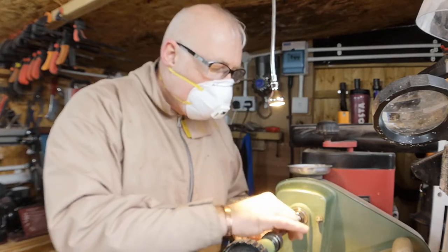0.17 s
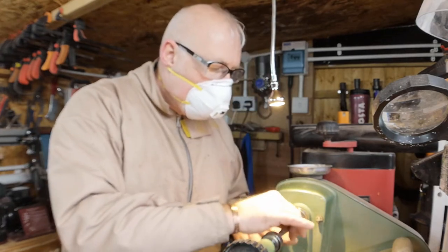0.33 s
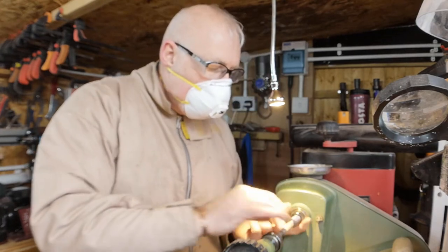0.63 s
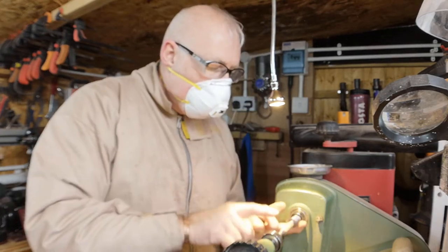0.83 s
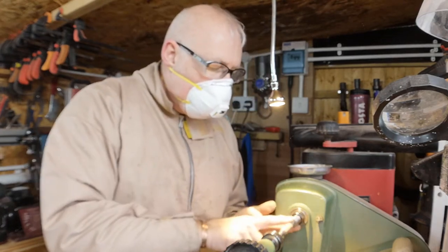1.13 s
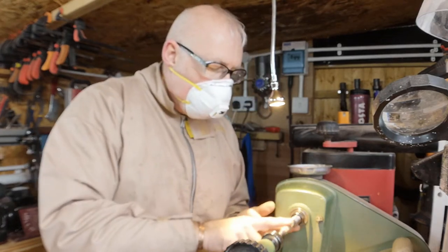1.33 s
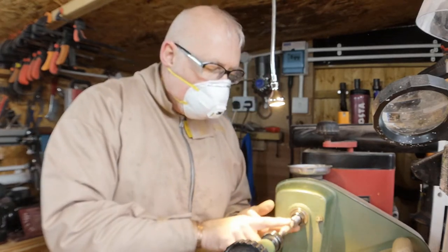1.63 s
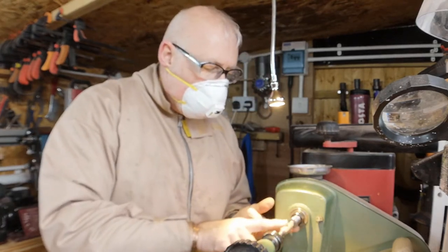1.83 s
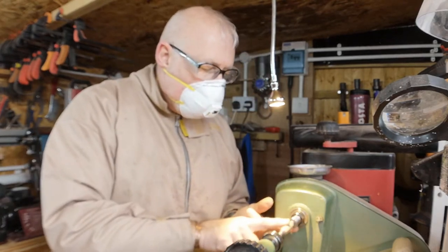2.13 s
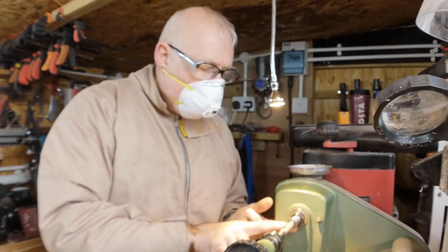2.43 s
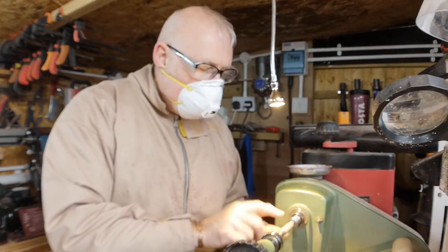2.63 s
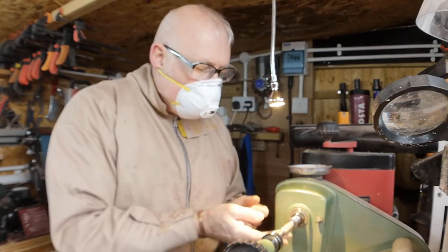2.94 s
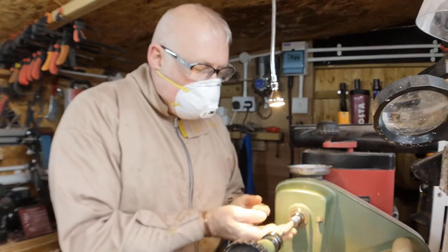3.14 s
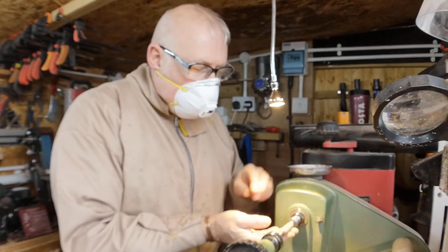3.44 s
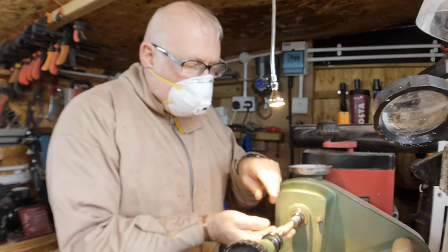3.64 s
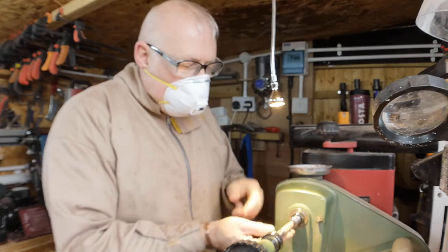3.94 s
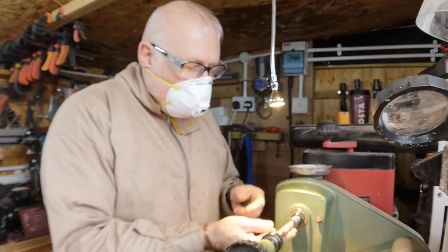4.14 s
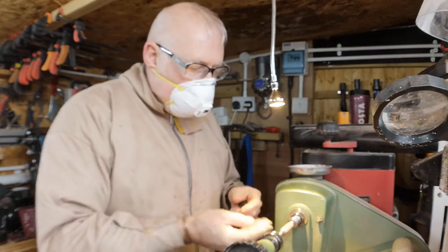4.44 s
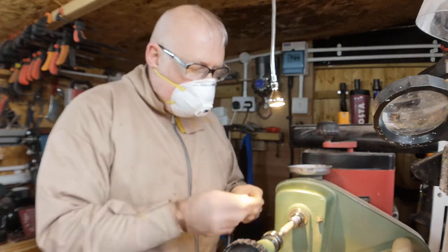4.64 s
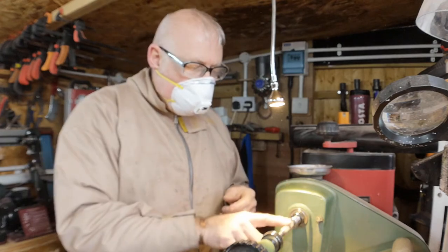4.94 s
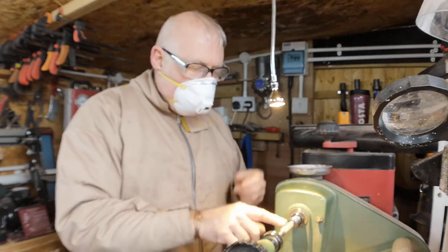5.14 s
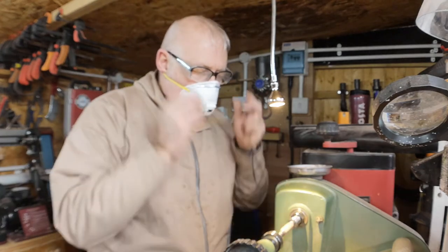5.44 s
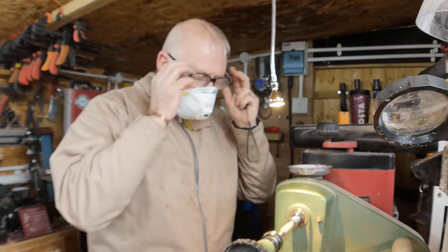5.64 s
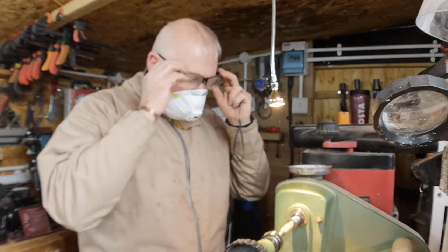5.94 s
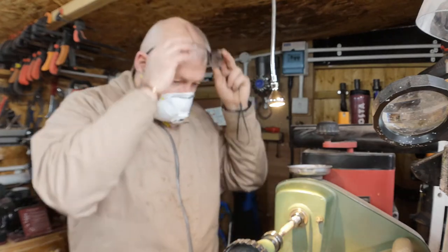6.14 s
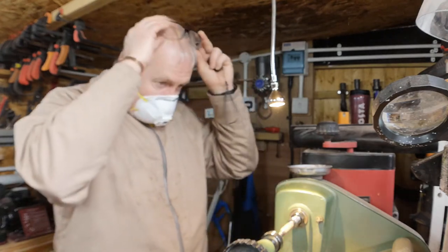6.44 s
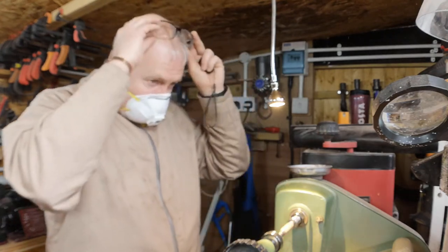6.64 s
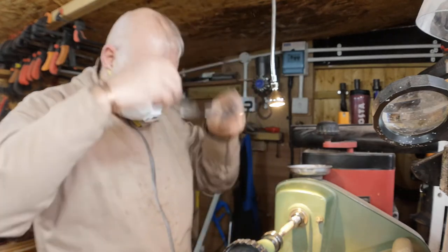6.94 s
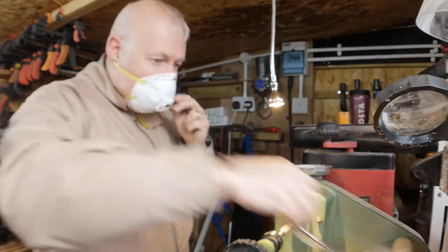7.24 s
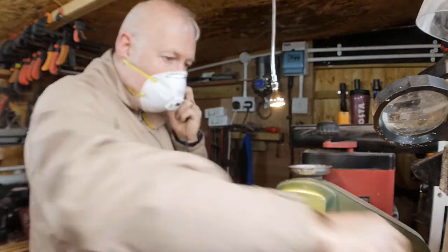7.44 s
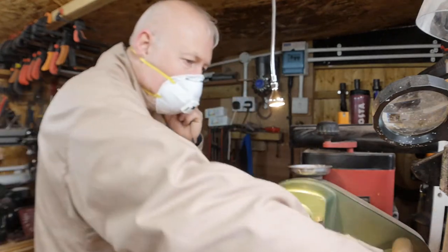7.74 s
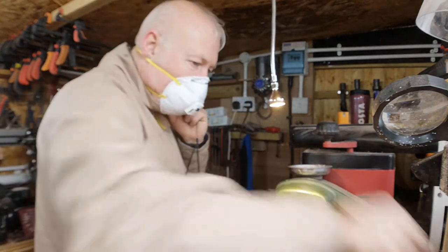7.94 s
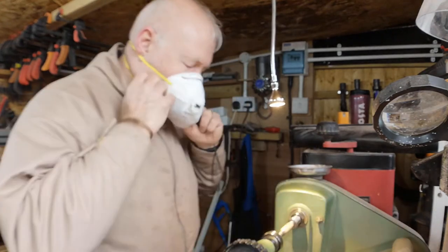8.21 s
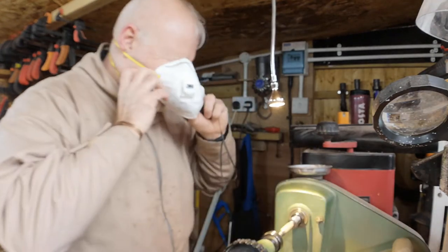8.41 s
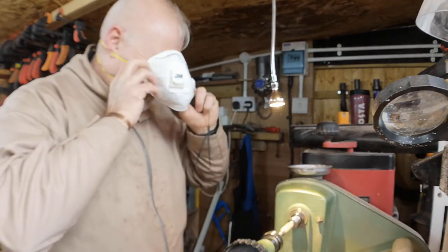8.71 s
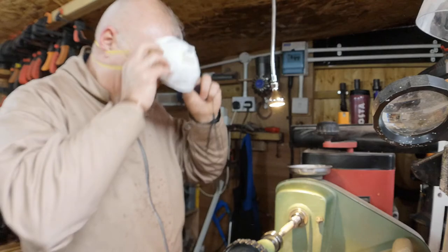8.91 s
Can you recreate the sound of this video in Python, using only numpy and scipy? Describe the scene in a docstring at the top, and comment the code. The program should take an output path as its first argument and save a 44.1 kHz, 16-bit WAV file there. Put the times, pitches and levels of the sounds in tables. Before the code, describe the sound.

In a small shed, soft hand rubbing and a lathe clack give way to rustling cloth, gritty shuffles and a sharp snap.

```python
"""A hand rubs a turned blank on a stopped wood lathe in a small, cluttered shed; the spindle clacks once.
The man shuffles back over gritty, booming floorboards, takes off his safety glasses, whose arm snaps
shut, steps over to lay them down and pulls at his dust mask. His canvas sleeves swish as he moves.
Every rub, swish and scrape is a dense run of tiny slips; every knock is a short chatter and a ring.
A low rumble and a faint hiss lie underneath."""
import sys
import numpy as np
from scipy import signal
from scipy.fft import rfft, irfft
from scipy.io import wavfile

SR = 44100
rng = np.random.default_rng(int(sys.argv[2]) if len(sys.argv) > 2 else 0)


def dump(signal):
    """Clip the signal to [-1, 1] and save it as 16-bit WAV at the path in sys.argv[1]."""
    limited = np.clip(np.atleast_2d(signal).T, -1, 1)
    pcm = np.round(limited * 32767).astype(np.int16)
    wavfile.write(sys.argv[1], SR, pcm)


N = 399972
TIME = np.arange(N) / SR

# palm strokes along the blank: peak_s, length_s, effort_db
PALM_STROKES = [(0.06, .15, -70.5), (0.27, 0.079, -74), (0.44, 0.085, -74), (0.59, 0.12, -71.5),
                (0.86, .1, -77)]
# how hard the fingertip rubs the blank: time_s, effort_db
FINGER_EFFORT = [(1.02, -82), (1.078, -81), (1.306, -75.5), (1.332, -82), (2.438, -84.5), (2.462, -83),
                 (2.506, -81.5), (2.522, -89), (2.8, -112)]
# sleeve swishes over the jacket, one per arm move: peak_s, length_s, effort_db
SLEEVE_STROKES = [(3.05, 0.089, -71.5), (3.22, 0.057, -80), (3.36, 0.034, -77.5), (3.495, 0.099, -67),
                  (3.62, 0.094, -67.5), (3.785, .07, -72.5), (4.05, 0.21, -69.5), (4.25, 0.065, -75.5),
                  (4.44, .07, -69.5), (4.98, 0.26, -91), (5.54, 0.3, -65.5), (6.25, 0.3, -75),
                  (7.08, 0.082, -68.5), (7.515, 0.098, -67.5), (7.6, 0.078, -69.5), (7.98, 0.39, -61),
                  (8.45, 0.2, -61), (8.98, 0.23, -65)]
# friction colour of palm, fingertip and canvas: freq_hz, gain_db
PALM_EQ = [(300, -12), (900, -6), (1700, -1), (4000, -8.5), (5800, -5.5), (8200, -2.5), (10000, -13.5),
           (15000, -22)]
FINGER_EQ = [(300, -12), (900, -13), (1700, -2), (4200, -10.5), (5300, -4.5), (8200, -1.5), (10000, -16),
             (15000, -17)]
SLEEVE_EQ = [(250, -4), (600, -7), (1100, -2.5), (2000, 3.5), (3400, -3), (4500, -3), (5800, 1), (8200, 2),
             (10000, -13.5), (12000, -19.5), (15000, -19.5)]
# narrow peaks that colour the rubbing sound: centre_hz, width_hz, lift_db
PALM_EQ_PEAKS = [(1710, 220, 4), (5760, 520, 9), (7560, 510, 4.5)]
FINGER_EQ_PEAKS = [(1690, 150, 5.1), (3380, 150, 6), (3800, 210, 6.6), (5200, 320, 8.4), (7830, 190, 7)]
# squeals of sliding skin or cloth: peak_s, length_s, level_db, pitch_hz
SLIDE_SQUEALS = [(0.516, 0.11, -77.5, 5760), (2.203, 0.78, -82, 7620), (7.738, 0.036, -56, 6000)]

# contacts of the lathe spindle, the arm of the glasses and the heel: start_s, level_db, chatter_s
SPINDLE_HITS = [(0.910, -41.5, 0.0018), (0.913, -38.5, 0.0045), (0.927, -44, 0.0054), (0.938, -56, .003)]
GLASSES_HITS = [(7.1548, -28, 0.0018), (7.1568, -21, 0.005), (7.166, -30, 0.013)]
HEEL_HITS = [(7.886, -37.5, 0.036), (7.9075, -25.5, 0.013), (7.916, -25.5, 0.013), (7.943, -43, 0.0053)]
# colour of each attack: freq_hz, gain_db
SPINDLE_EQ = [(200, 1.5), (600, -10), (900, 8.5), (1250, -18), (1750, 5), (2750, 6), (4000, -6),
              (5600, -0.5), (6800, -13.5), (9600, -15), (11000, -35), (15000, -28)]
GLASSES_EQ = [(300, -27), (900, -29.5), (1600, -18), (2600, -19.5), (3600, -3), (4500, -14), (6000, -5.5),
              (8400, -3), (10500, -13.5), (12500, -16), (15000, -21.5)]
HEEL_EQ = [(80, 7), (300, 3), (650, -3.5), (900, 1.5), (1700, -4.5), (2700, -3), (4200, -18), (6000, -19.5),
           (8400, -14), (10500, -33), (15000, -36)]
# ring of the spindle and the board, relative to the hardest contact: pitch_hz, level_db, t60_s
SPINDLE_MODES = [(356, -26, 0.49), (804, -12, 0.18), (1700, -8, 0.11), (2720, -5, .11), (3350, -14, 0.069),
                 (4730, -21, 0.11), (5740, -15, 0.11), (7840, -14, 0.082), (9510, -28, .12)]
HOLLOW_BOARD_MODES = [(517, -4.5, 0.178), (785, -6.5, 0.1), (1125, -11, 0.062), (1630, -11, 0.051),
                      (2006, -9, 0.064)]
# bright ringing pitches heard after the snap, relative to its hardest contact: pitch_hz, level_db, t60_s
AFTER_SNAP_RING = [(2110, -26, 0.099), (3740, -24, 0.15), (5660, -18, 0.17), (5700, -4, 0.06),
                   (6340, -25, 0.071), (6640, -5.5, 0.064), (7500, -2, 0.064), (8043, -26, 0.12),
                   (8260, -16, 0.093)]

# short rasping scrapes (soles on grit, a light finger brush, a rub of the dust mask):
# peak_s, length_s, level_db, rasp_hz, rasp_lift_db, treble_db
SCRAPES = [ (2.96, 0.027, -65.5, 3350, 7, -9), (5.779, 0.037, -50.5, 2260, 15, -3),
           (5.948, 0.04, -44, 2860, 6.5, -1), (7.692, 0.013, -51.5, 980, 11, -15),
           (7.729, 0.029, -47.5, 2960, 0, -9.5), (7.801, 0.047, -45, 1030, 8.5, 3),
           (7.978, 0.057, -54, 520, 5.5, -8), (8.094, 0.018, -58, 1690, 4, 0),
           (8.636, 0.011, -50.5, 1690, 17.5, 6), (8.652, 0.014, -47.5, 1950, 0, -20.5),
           (8.991, 0.18, -64.5, 1030, 21, 4)]
# colour of the scrapes: freq_hz, gain_db
SCRAPE_EQ = [(100, -18), (300, 1.5), (700, -11.5), (1100, -6), (1800, -3.5), (3000, -4), (4300, -8.5),
             (6000, -13), (8400, -6), (10500, -22), (15000, -31)]
# narrow peaks common to all scrapes: centre_hz, width_hz, lift_db
SCRAPE_EQ_PEAKS = [(520, 18, 6.5), (5600, 130, 14), (7560, 470, 6.5)]
# floorboards booming as his weight shifts: peak_s, rise_s, level_db, pitch_hz
BOARD_BOOMS = [(5.793, 0.021, -42, 123), (5.961, .034, -41.5, 121.6), (7.2, 0.022, -49, 88.2),
               (7.766, 0.043, -45, 182.3), (7.936, 0.021, -39.5, 95.1), (7.99, 0.029, -40.5, 190),
               (8.653, 0.021, -50.5, 205.6)]
# low end of the rocking floor: freq_hz, gain_db
FLOOR_EQ = [(15, -14.5), (35, 7.5), (65, -4), (110, -4.5), (200, -26), (500, -38), (1500, -64)]

# glasses, then dust mask, brushing over head and collar: peak_s, length_s, level_db, treble_db
HEAD_BRUSHES = [(7.011, 0.042, -58, 1.5), (8.304, 0.027, -61.5, -10), (8.383, 0.038, -52, 4),
                (8.495, 0.033, -60.5, -9), (8.716, 0.094, -65.5, 21), (8.818, 0.038, -63.5, -20),
                (8.963, 0.049, -54.5, -10)]
# colour of that brushing: freq_hz, gain_db
BRUSH_EQ = [(300, -20.5), (900, -8), (2000, -2), (3800, -4.5), (6000, -1), (8100, 4), (9600, -4),
            (11000, -15.5), (15000, -21.5)]
# wood and plastic ticking under the fingers: start_s, level_db, ring_hz, ring_lift_db, treble_db
FINGER_TICKS = [(1.928, -58, 500, 17, -8), (5.439, -48.5, 800, 22, -19), (5.859, -42.5, 2250, 20, 15),
                (6.743, -59, 2340, 20, -13), (6.814, -51, 2960, 8, 13), (6.903, -52.5, 2720, 13, 12),
                (6.967, -42, 3300, -2, 19), (8.67, -47.5, 3800, 26, 1)]
# colour of the ticks: freq_hz, gain_db
TICK_EQ = [(200, -4), (700, -14), (2000, 13), (4500, 4.5), (8200, 1.5), (11000, -44), (15000, -35)]
# colour of the steady rumble and hiss: freq_hz, gain_db
RUMBLE_EQ = [(12, -1.5), (25, -2.5), (45, -4.5), (65, -8), (100, -13.5), (150, -23.5), (220, -31.5),
             (400, -35.5), (1000, -67.5)]
HISS_EQ = [(60, -11), (200, 7.5), (500, -3.5), (1000, 2), (1800, 1), (2600, 2.5), (4000, -5), (6000, -8),
           (8000, -9), (10000, -9.5), (15000, -11)]


def palm():
    """The palm strokes the blank, resting lightly on the wood between strokes until the clack."""
    effort_db = strokes_db(PALM_STROKES, rest_db=-81, start_s=0, end_s=SPINDLE_HITS[0][0])
    return amp(2.0) * rubbing(effort_db, PALM_EQ, PALM_EQ_PEAKS, flutter_db=1.0, side_db=-12.5)


def fingertip():
    """A fingertip slides over the blank, pressing now harder, now softer."""
    effort_db = np.interp(TIME, *np.transpose(FINGER_EFFORT), left=-120, right=-120)
    return amp(5.5) * rubbing(effort_db, FINGER_EQ, FINGER_EQ_PEAKS, flutter_db=1.5, side_db=-11)


def sleeves():
    """Canvas swishes on canvas, over a faint rustle once he lets go of the blank."""
    effort_db = strokes_db(SLEEVE_STROKES, rest_db=-79, start_s=2.85, end_s=np.inf)
    return amp(1.5) * rubbing(effort_db, SLEEVE_EQ, [], flutter_db=2.0, side_db=-13)


def squeals(width_hz=180, flutter_db=3.5):
    """The slips of sliding skin or cloth gather round one high pitch."""
    out = np.zeros(N)
    for peak_s, length_s, level_db, pitch_hz in SLIDE_SQUEALS:
        slips = grains(N, per_s=4400, spread_db=6)
        ringing = signal.lfilter(*signal.iirpeak(pitch_hz, pitch_hz / width_hz, fs=SR), slips)
        out += amp(level_db) * stroke(TIME - peak_s, length_s) * rms_one(ringing)
    out *= amp(flutter_db * drift(27))
    return shed(pan(out, -8), direct_db=-5, near_db=-2, tail_db=-13)


def spindle_clack():
    """The lathe spindle knocks in one quick cluster of contacts and rings on."""
    return struck(SPINDLE_HITS, SPINDLE_EQ, SPINDLE_MODES, side_db=-4.5, near_db=-1.5, tail_db=-5)


def glasses_snap():
    """The arm of the glasses snaps shut; bright pitches ring briefly after it."""
    return struck(GLASSES_HITS, GLASSES_EQ, AFTER_SNAP_RING, side_db=-6.5, near_db=0, tail_db=-7)


def heel_knock():
    """A heel comes down on a hollow board."""
    return struck(HEEL_HITS, HEEL_EQ, HOLLOW_BOARD_MODES, side_db=-5.5, near_db=-6, tail_db=-13.5)


def scrapes(rasp_width_hz=450, lead_s=.2):
    """Soles on grit, a light finger brush and a rub of the dust mask, each rasping at its own pitch."""
    out, t = np.zeros((2, N)), TIME[:SR // 2] - lead_s
    for peak_s, length_s, level_db, rasp_hz, lift_db, treble_db in SCRAPES:
        pressure = amp(level_db) * stroke(t, length_s)
        rasp = [(rasp_hz, rasp_width_hz, lift_db), *SCRAPE_EQ_PEAKS]
        slips = [pressure * grains(len(t), per_s=5000, spread_db=2.0) for channel in range(2)]
        scrape = np.array([colour(x, SCRAPE_EQ, rasp, treble_db) for x in slips])
        add(out, peak_s - lead_s, pan(scrape, -4))
    return shed(out, direct_db=1, near_db=-24, tail_db=0.5)


def floorboards(boom_decay_s=0.037, sag_hz_per_s=130, floor_decay_s=0.084, lead_s=.2):
    """A loaded board booms, its pitch sinking as the load eases; the whole floor rocks on for longer."""
    boom, rocking, t = np.zeros(N), np.zeros(N), TIME[:SR] - lead_s
    since_peak = np.maximum(t, 0)
    wobble = 1 + 0.087 * drift(31)
    for peak_s, rise_s, level_db, pitch_hz in BOARD_BOOMS:
        load = amp(level_db) * swell(np.minimum(t, 0), rise_s, rise_s)
        glide_hz = (pitch_hz - sag_hz_per_s * since_peak) * np.interp(peak_s + t, TIME, wobble)
        tone = np.sin(2 * np.pi * np.cumsum(glide_hz) / SR)
        add(boom, peak_s - lead_s, load * np.exp(-since_peak / boom_decay_s) * tone)
        add(rocking, peak_s - lead_s, load * np.exp(-since_peak / floor_decay_s))
    sway = amp(-4.5) * rocking * colour(rng.standard_normal(N), FLOOR_EQ)
    roughness = 1 + 0.39 * drift(79)
    return spaced(pan(np.sqrt(2) * boom * roughness + sway, 0))


def glasses_and_mask(lead_s=.5):
    """The glasses and the stiff mask brush over head and collar in short, bright strokes."""
    out = np.zeros((2, N))
    for peak_s, length_s, level_db, treble_db in HEAD_BRUSHES:
        pressure = amp(level_db) * stroke(TIME[:SR] - lead_s, length_s)
        slips = [pressure * grains(SR, per_s=4000, spread_db=2.0) for channel in range(2)]
        brush = np.array([colour(x, BRUSH_EQ, [], treble_db) for x in slips])
        add(out, peak_s - lead_s, pan(brush, -4.5))
    return shed(out, direct_db=2.0, near_db=-14, tail_db=-6.5)


def ticks(ring_width_hz=600):
    """Fingers touch wood and plastic lightly, each touch with one brief ring."""
    out = np.zeros(N)
    for start_s, level_db, ring_hz, lift_db, treble_db in FINGER_TICKS:
        touch = contact(level_db, chatter_s=0.0033)
        add(out, start_s, colour(touch, TICK_EQ, [(ring_hz, ring_width_hz, lift_db)], treble_db))
    return shed(pan(out, -5), direct_db=-3.5, near_db=-9, tail_db=-4)


def room_tone(rumble_db=-59.5, hiss_db=-74.5):
    """A steady bed: low rumble in the centre, faint hiss spread wide."""
    rumble = amp(rumble_db) * colour(rng.standard_normal(N), RUMBLE_EQ)
    hiss = amp(hiss_db) * np.array([colour(noise, HISS_EQ) for noise in rng.standard_normal((2, N))])
    return spaced(pan(rumble, 0)) + hiss


def rubbing(effort_db, eq, peaks, flutter_db, side_db, brighten=0.41):
    """Fine friction over a broad patch: brisker strokes are brighter, and the hiss leans right."""
    level_db = effort_db + flutter_db * drift(42)
    slips = [amp(level_db) * grains(N, per_s=9700, spread_db=2.5) for channel in range(2)]
    friction = np.array([colour(x, eq, peaks) for x in slips])
    body = signal.sosfilt(signal.butter(1, 2200, "low", fs=SR, output="sos"), friction)
    hiss = friction - body
    vigour_db = np.clip(level_db + 68, -10, 20)
    return body * amp(-brighten * vigour_db) + hiss * amp([[side_db], [0]])


def grains(count, per_s, spread_db):
    """Friction grain: a dense run of tiny slips of uneven size, at rms 1."""
    slips = rng.random(count) < per_s / SR
    return rms_one(slips * rng.standard_normal(count) * amp(spread_db * rng.standard_normal(count)))


def strokes_db(strokes, rest_db, start_s, end_s):
    """Envelope of a run of strokes, over a light contact held from start_s to end_s."""
    power = amp(rest_db) ** 2 * ((TIME >= start_s) & (TIME < end_s)) + 1e-12
    for peak_s, length_s, effort_db in strokes:
        power += (amp(effort_db) * stroke(TIME - peak_s, length_s)) ** 2
    return 10 * np.log10(power)


def stroke(t, length_s, rise_share=0.51):
    """One stroke swells and fades almost evenly about t = 0."""
    return swell(t, rise_share * length_s, (1 - rise_share) * length_s)


def swell(t, rise_s, fall_s):
    """Bell-shaped envelope that peaks at t = 0."""
    return np.exp(-.5 * (t / np.where(t < 0, rise_s, fall_s)) ** 2)


def struck(hits, eq, partials, side_db, near_db, tail_db):
    """Each contact cracks into the room, and ringing pitches follow the hardest."""
    force, ring, t = np.zeros(N), np.zeros(N), TIME[:SR // 2]
    for start_s, level_db, chatter_s in hits:
        add(force, start_s, contact(level_db, chatter_s))
    hardest_s, hardest_db, _ = max(hits, key=lambda hit: hit[1])
    for pitch_hz, level_db, t60_s in partials:
        decay = amp(hardest_db + level_db) * np.exp(-np.log(1000) * t / t60_s)
        add(ring, hardest_s, rng.choice([-1, 1]) * decay * np.sin(2 * np.pi * pitch_hz * t))
    attack = pan(colour(force, eq), side_db)
    return shed(attack, -5.5, near_db, tail_db) + spaced(pan(ring, side_db))


def contact(level_db, chatter_s, crack=0.32, count=8192):
    """A sharp first touch, then the surfaces chatter briefly."""
    t = TIME[:count]
    chatter = rng.choice([-1, 1], count) * np.exp(-t / chatter_s)
    return amp(level_db) * (chatter + (t == 0) * crack * np.linalg.norm(chatter))


def shed(pair, direct_db, near_db, tail_db, near_t60_s=0.0063, tail_t60_s=0.14):
    """Direct sound, scatter from the bench and tools close by, and the short tail of the walls."""
    t = TIME[:SR // 3]
    echoes = 0
    for level_db, t60_s in ((near_db, near_t60_s), (tail_db, tail_t60_s)):
        decay = rng.standard_normal((2, len(t))) * np.exp(-np.log(1000) * t / t60_s)
        echoes = echoes + amp(level_db) * decay / np.linalg.norm(decay, axis=1, keepdims=True)
    # long waves bend round the clutter instead of scattering
    echoes = signal.sosfilt(signal.butter(2, 397, "high", fs=SR, output="sos"), echoes)
    return amp(direct_db) * spaced(pair) + signal.oaconvolve(pair, echoes, axes=1)[:, :N]


def colour(x, eq, peaks=(), treble_db=0, size=8192):
    """Unit-power EQ: a broad curve, a treble shelf and narrow peaks that ring on."""
    hz = np.maximum(np.fft.rfftfreq(size, 1 / SR), 1)
    eq_hz, eq_db = np.transpose(eq)
    shelf_db = treble_db * hz ** 2 / (hz ** 2 + 3500 ** 2)
    gain = amp(np.interp(np.log(hz), np.log(eq_hz), eq_db) + shelf_db)
    for centre_hz, width_hz, lift_db in peaks:
        gain *= np.sqrt(1 + (amp(lift_db) ** 2 - 1) / (1 + (2 * (hz - centre_hz) / width_hz) ** 2))
    cepstrum = irfft(np.log(gain))[:size // 2]
    response = irfft(np.exp(2 * rfft(cepstrum, size)))   # minimum phase: nothing sounds early
    return signal.oaconvolve(x, response / np.linalg.norm(response))[:len(x)]


def drift(rate_hz):
    """Smooth random wander at rms 1, rolling off above rate_hz."""
    pole = np.exp(-2 * np.pi * rate_hz / SR)
    return rms_one(signal.lfilter([1], [1, -2 * pole, pole * pole], rng.standard_normal(N + SR))[SR:])


def pan(x, side_db):
    """Two channels; side_db is left minus right."""
    return x * amp(np.array([[side_db], [-side_db]]) / 2)


def spaced(pair, lag_s=.0006):
    """Direct sound arrives on the left a little after the right."""
    return np.array([np.interp(TIME - lag_s, TIME, pair[0]), pair[1]])


def add(track, start_s, sound):
    """Lays a sound into a track at start_s."""
    start = round(start_s * SR)
    part = sound[..., :N - start]
    track[..., start:start + part.shape[-1]] += part


def amp(db):
    """Decibels to linear gain."""
    return 10 ** (np.asarray(db) / 20)


def rms_one(x):
    """Normalises to rms 1."""
    return x / np.sqrt(np.mean(x ** 2) + 1e-20)


def scene():
    """The mix: rubbing, knocks, movement and handling over the room tone."""
    rubs = shed(palm() + fingertip() + sleeves(), direct_db=-1, near_db=-11.5, tail_db=0.5) + squeals()
    movement = scrapes() + floorboards()
    knocks = spindle_clack() + glasses_snap() + heel_knock()
    handling = ticks() + glasses_and_mask()
    return rubs + knocks + movement + handling + room_tone()


def record(dry, cutoff_hz=15400):
    """A steep low-pass takes the very top off the mix."""
    return signal.sosfilt(signal.ellip(10, .1, 80, cutoff_hz, fs=SR, output="sos"), dry)


dry = scene()
out = record(dry)
dump(out)
```